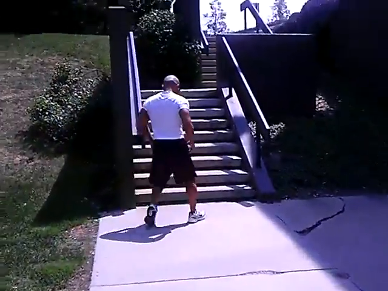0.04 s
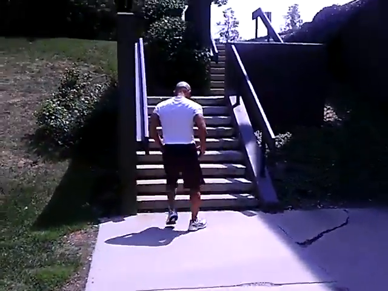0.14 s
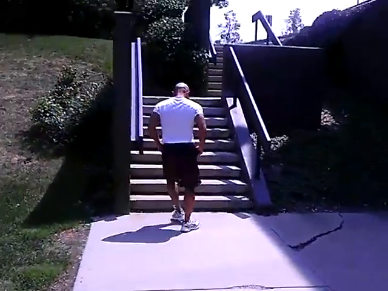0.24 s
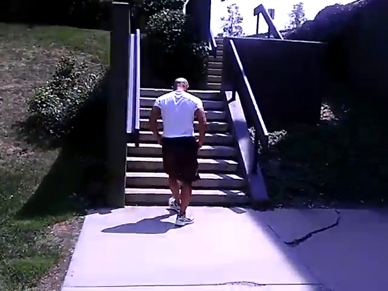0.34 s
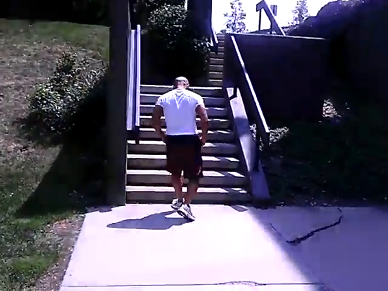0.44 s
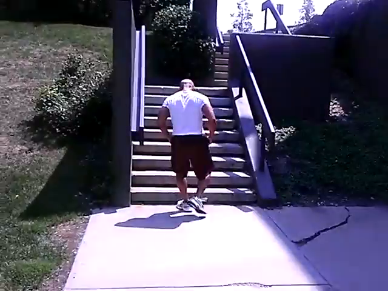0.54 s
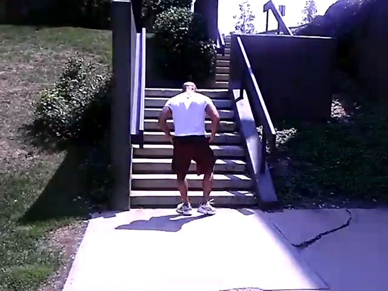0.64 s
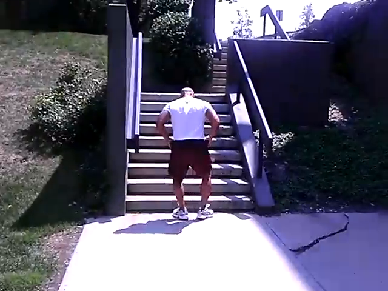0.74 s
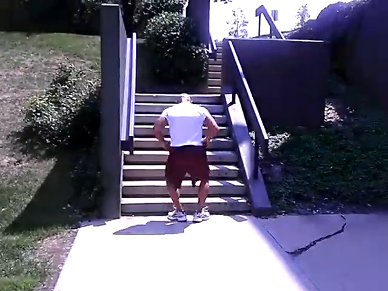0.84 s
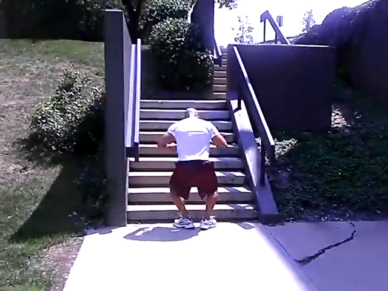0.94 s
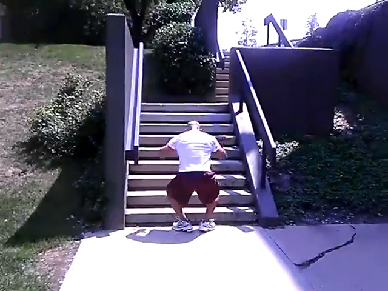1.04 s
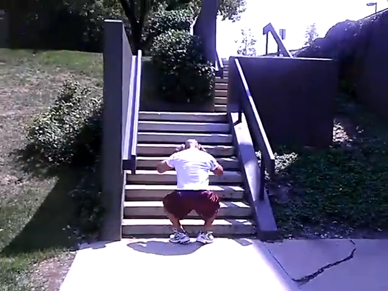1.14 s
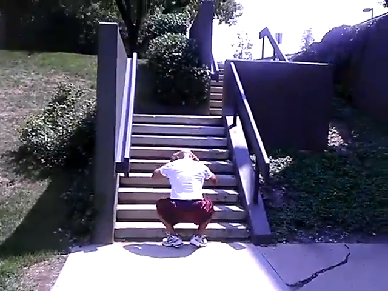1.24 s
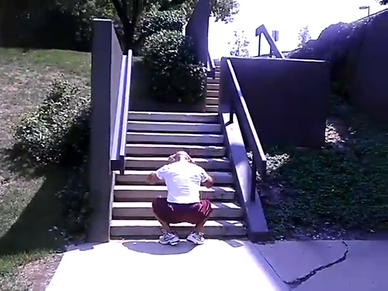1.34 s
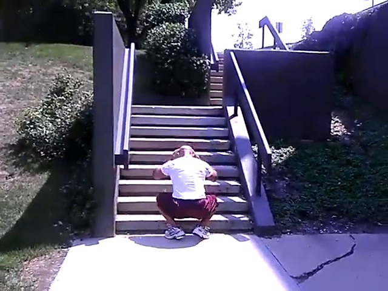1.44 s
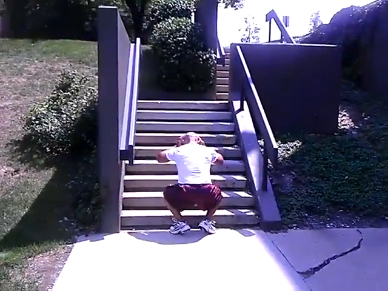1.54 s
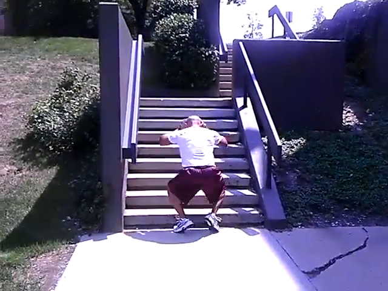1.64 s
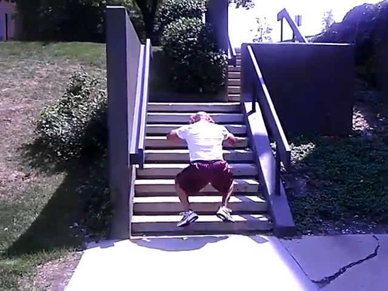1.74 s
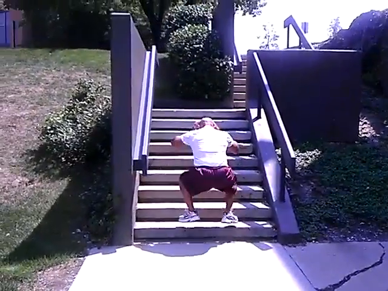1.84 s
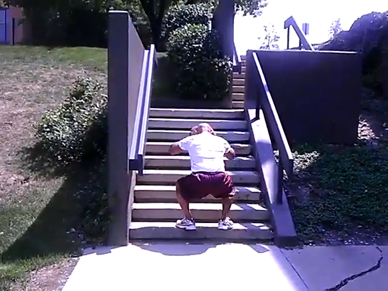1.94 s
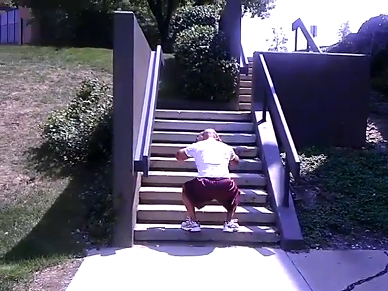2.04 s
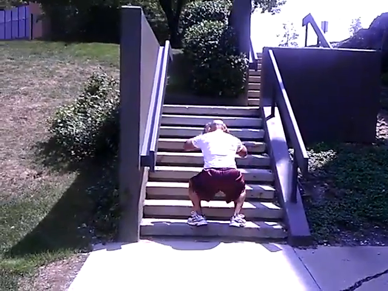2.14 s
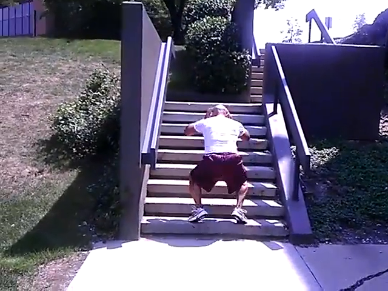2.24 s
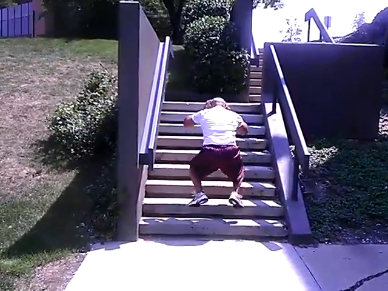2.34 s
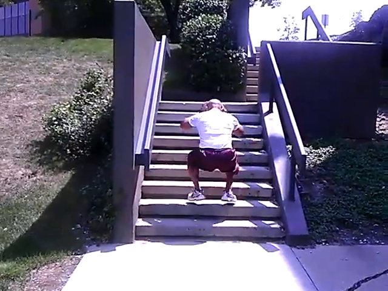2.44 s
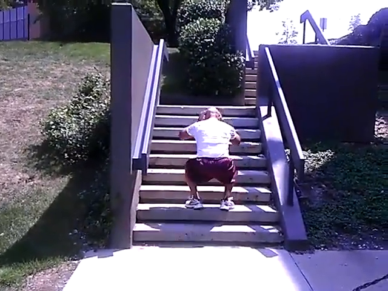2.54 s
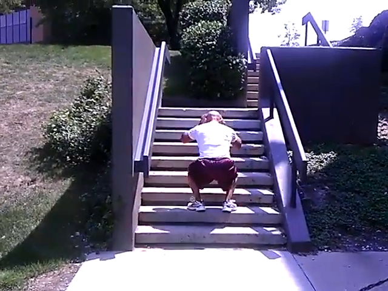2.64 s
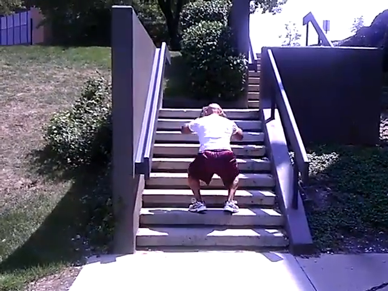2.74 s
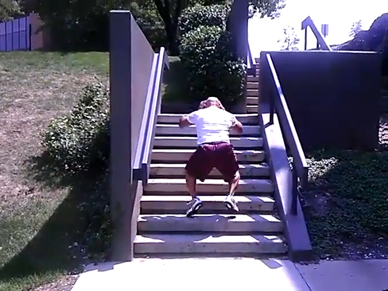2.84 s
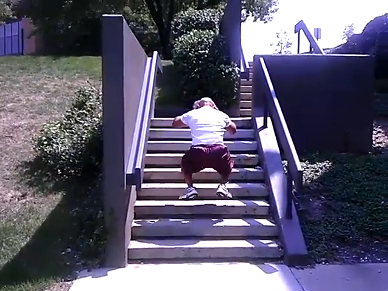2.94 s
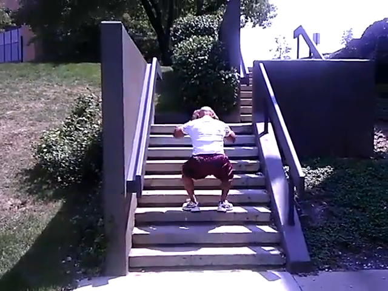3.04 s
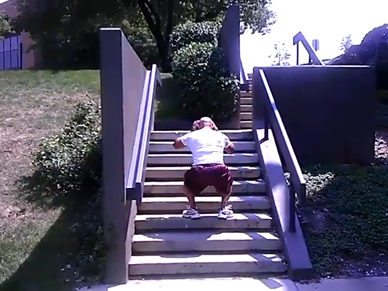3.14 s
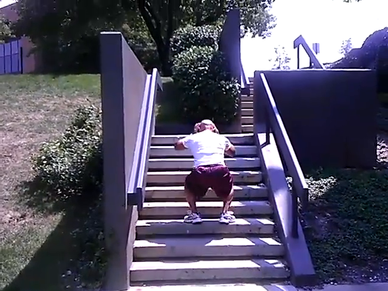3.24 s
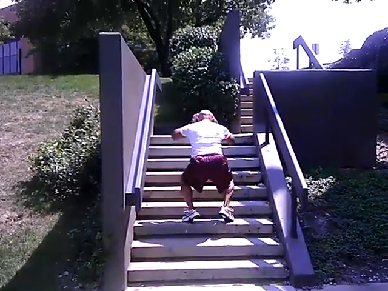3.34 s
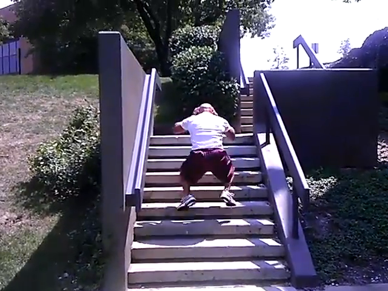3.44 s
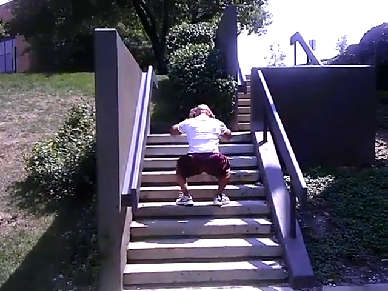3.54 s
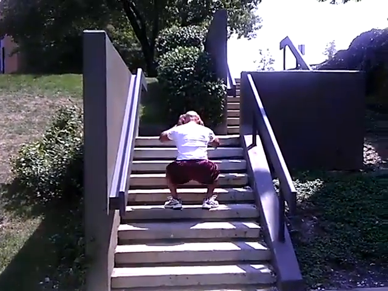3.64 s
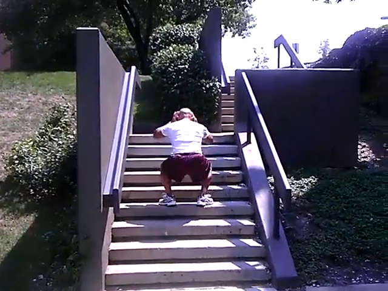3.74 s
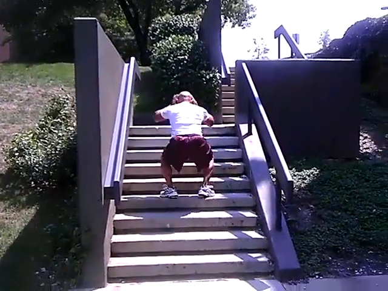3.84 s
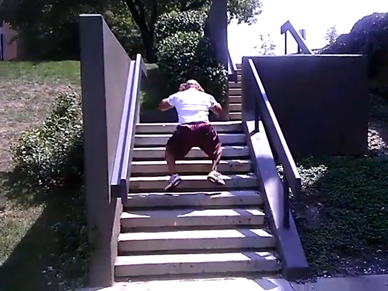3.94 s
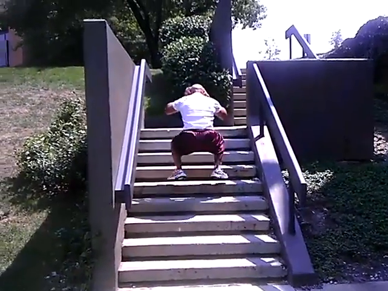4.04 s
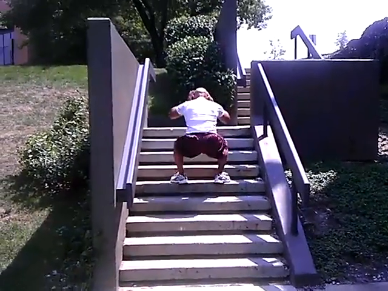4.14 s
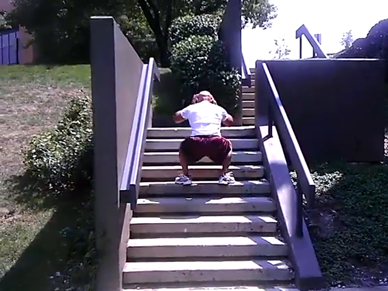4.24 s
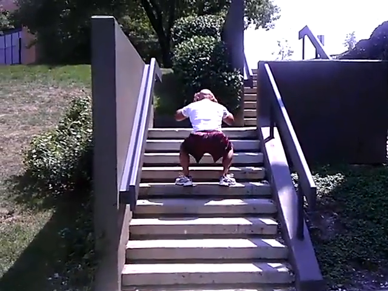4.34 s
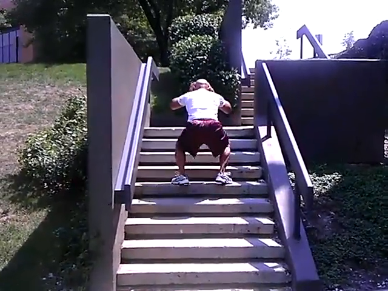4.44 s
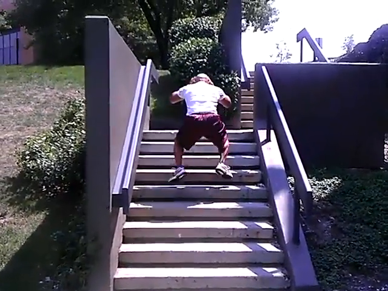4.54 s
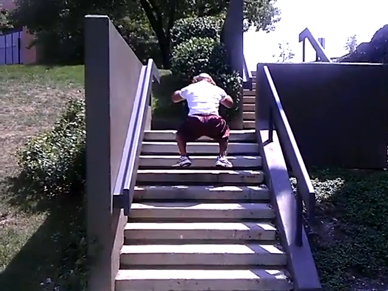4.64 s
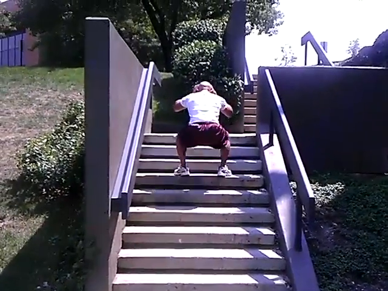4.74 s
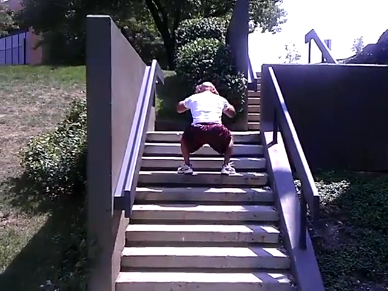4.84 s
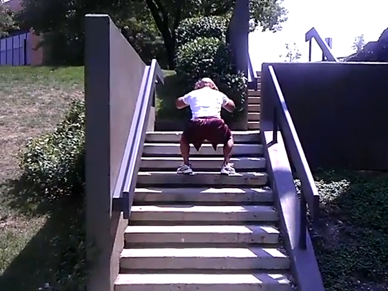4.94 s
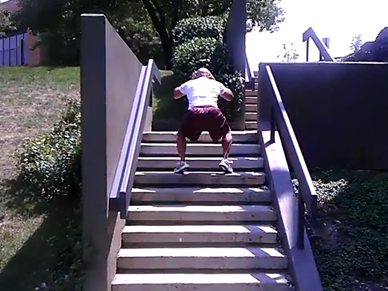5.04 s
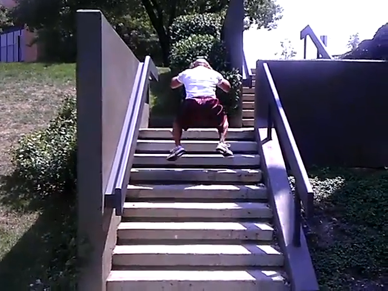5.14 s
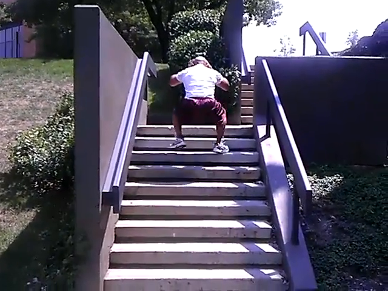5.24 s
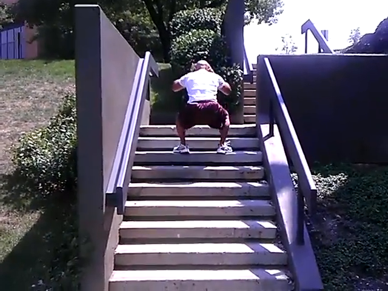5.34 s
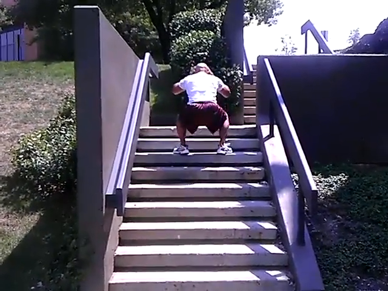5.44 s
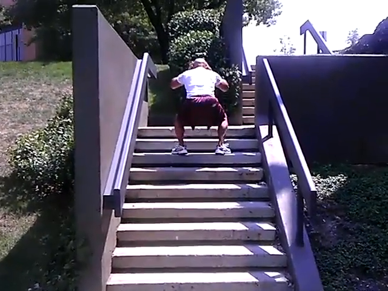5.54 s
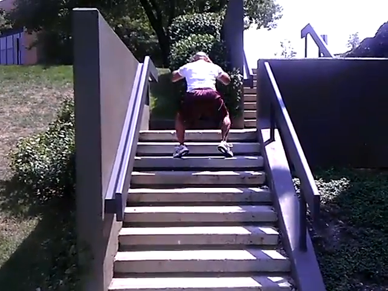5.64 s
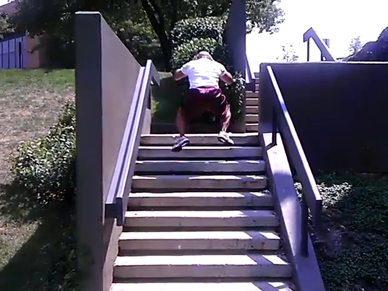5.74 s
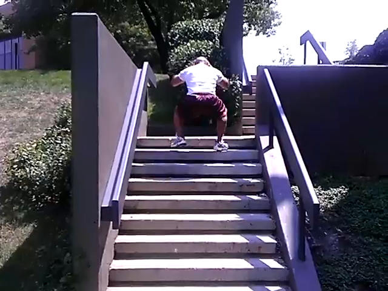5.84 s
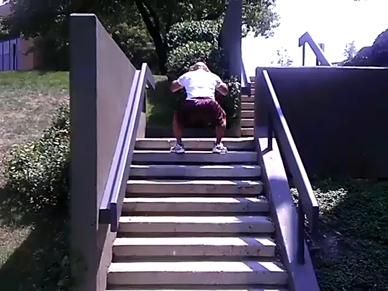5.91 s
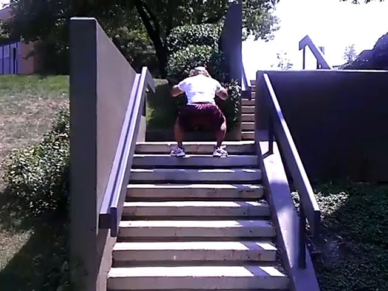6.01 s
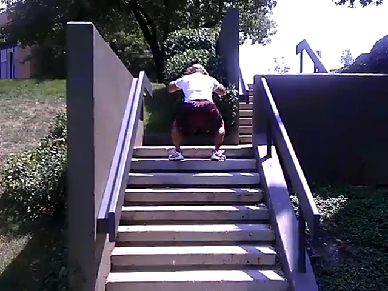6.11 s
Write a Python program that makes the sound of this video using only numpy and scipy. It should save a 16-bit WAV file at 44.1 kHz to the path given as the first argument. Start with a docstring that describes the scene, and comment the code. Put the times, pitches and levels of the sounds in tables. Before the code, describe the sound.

Outdoors by concrete stairs, heard from a few metres through a small microphone with thin bass and dulled top. Distant traffic murmurs over very faint hiss; a far engine drops away in the first half second, then creeps back low. Sneakers scuff and crack grit at about 0.1, then lightly at 0.6, 0.8 and 0.9, with two faint high fluttering bird notes around 0.83 and 0.96. Small grit ticks follow at 1.3, 1.4 and 1.7. Jump landings come at 2.0 (softer, duller), 2.6, 3.1, 3.65, 4.2, 4.8, 5.4 and 6.0: two shoes almost together, then heels settling, a compact slap with hollow thump, airy pop and crushed grit. Faint toe scuffs precede them. The 4.2 landing has a sharp rubber chirp. Walls return short dull echoes and a thin tail. The engine wavers, gathering speed and growing clearer after 5.2, as traffic rises slightly.

```python
"""Far traffic murmurs and a distant engine fades as sneakers shuffle on concrete a few metres away.
Someone then jumps up outdoor stairs with both feet. Each landing is three quick sole contacts, built from
damped modes (thump, hollow slap, air pop) and noise bursts (slap, crack, grit); each take-off is a faint
noise scuff. The engine, a few wavering sine orders, comes back low and gathers speed; a bird calls in
two fluttering sines. Walls throw back short, dull echoes and a thin tail."""
import sys
import numpy as np
from scipy import signal
from scipy.fft import rfft, irfft
from scipy.io import wavfile

SR = 44100
rng = np.random.default_rng(int(sys.argv[2]) if len(sys.argv) > 2 else 0)


def unload_wav(signal):
    """Save mono or channel-first audio to the path in sys.argv[1] as 16-bit WAV at rate SR, clipped to [-1, 1]."""
    wavfile.write(
        sys.argv[1],
        SR,
        np.round(np.clip(np.atleast_2d(signal).T, -1, 1) * 32767).astype(np.int16),
    )


N = 272348
TIME = np.arange(N) / SR
AGE = TIME[:SR // 4]   # time since a blow, s

# Road noise spectrum: f/Hz, density/dB per Hz (only the shape counts)
TRAFFIC_COLOUR = [(22, -16.5), (50, -13.5), (75, -11), (95, -6.5), (122, 0), (165, -7), (220, -6.5),
                  (310, -10), (550, -13.5), (900, -17.5), (1200, -20), (2100, -25), (3000, -34),
                  (5200, -56)]
# Steady hiss spectrum: f/Hz, density/dB per Hz (only the shape counts)
HISS_COLOUR = [(1500, -20), (3000, 5), (4500, 4), (6000, -3), (7300, -2), (8500, 5), (9200, -8)]
HISS_DB = -65
# Far traffic draws slowly nearer: t/s, level/dB (before trim and swell)
TRAFFIC_LEVEL = [(0, -47.5), (2.3, -46.5), (3.25, -44.5), (5.86, -43), (6.18, -40)]
# Far engine fades, comes back low and gathers speed: t/s, firing rate f/Hz, level/dB (before trim)
ENGINE_CURVE = [(0, 115.3, -39.5), (.5, 113, -64), (.72, 101.6, -46), (1.0, 103, -44.5), (1.6, 108, -41.5),
                (1.85, 116, -44), (2.15, 120.5, -40), (3.3, 122.5, -45.5), (3.7, 120, -47),
                (4.2, 127, -42.5), (4.9, 126, -43), (5.25, 126.7, -34), (5.65, 128, -38),
                (6.18, 135, -30.5)]
# Exhaust orders: multiple of the firing rate, level/dB (relative, before throb)
ENGINE_ORDERS = [(.75, -34), (1, -5), (2, -18), (3, -25.5)]
# Left-right likeness of the street and echo tail above the bass: f/Hz, likeness/0-1
FAR_LIKENESS = [(100, .98), (300, .88), (550, .78), (1100, .5), (2300, .35), (5000, .12)]
# Left minus right for the street: f/Hz, level/dB
FAR_LEAN = [(100, 0), (200, .4), (1000, .6), (3000, 2.4), (5500, 2.2), (8500, -2)]
# Distant bird notes: start t/s, length/s, centre f/Hz, level/dB (before flutter)
CHIRPS = [(.827, .07, 4620, -67), (0.957, .08, 4490, -62)]
# Echoes off the stairs and side walls, last off a building across the yard: delay t/s, level/dB
ECHOES = [(.0052, -19), (0.0135, -20), (.029, -24), (.062, -18)]

# Left-right likeness of the shoe noise above the bass: f/Hz, likeness/0-1
NEAR_LIKENESS = [(100, .98), (300, .85), (600, .6), (1200, .62), (2200, .64), (4500, .48), (8000, .35)]
# Left minus right for the shoe bursts: f/Hz, level/dB
NEAR_LEAN = [(180, 0), (600, .4), (1200, 1.2), (2200, 2.0), (3100, 1.2), (5200, 4.4), (7500, -3.5)]
# Grains of grit cracking under a shoe: t/s, level/dB, f/Hz
TICKS = [(.0685, -35, 2320), (.136, -39.5, 2070), (.578, -42, 2400), (0.939, -42, 1800),
         (1.326, -42.5, 3293), (1.4255, -37.5, 1580), (1.731, -38, 2370)]
# Shoes shuffling: middle t/s, level/dB (before flicker), bell spread/s, share of low rasp/0-1
SCUFFS = [(0.072, -47.5, 0.016, 0.37), (0.096, -45.5, 0.0051, 0), (.089, -56.5, 0.048, 0.92),
          (0.58, -58, .0045, 0.02), (.794, -44, 0.01, 0.87), (0.932, -55.5, 0.033, 0.86),
          (1.643, -56.5, .011, 0.25)]
# Bright side of a scuff: f/Hz, density/dB per Hz (only the shape counts)
SCRAPE_COLOUR = [(1500, -37), (3000, 2.5), (4500, 5.5), (6000, 7), (7500, 1.5), (9000, -2.5)]
# Low, rough side of a scuff, also the dust of a tick: f/Hz, density/dB per Hz (only the shape counts)
RASP_COLOUR = [(300, -19.5), (850, 5), (1500, -3.5), (2400, -3), (3500, -13.5), (6000, -21.5)]
# Rubber catching as a shoe lands or settles: t/s, f/Hz, level/dB, time to fall 60 dB/s
SLIPS = [(2.679, 5500, -57.5, 0.075), (3.164, 5900, -47, .04), (4.206, 5086, -21, .0086),
         (4.216, 3550, -28, 0.021)]

# Flat of the sole slapping: f/Hz, density/dB per Hz (only the shape counts)
SLAP_COLOUR = [(40, -46), (85, 2), (200, 3.5), (330, -3), (450, 1), (650, 2), (950, -2), (1300, -13),
               (2200, -9), (3000, -54)]
# Air cracking out of the tread: f/Hz, density/dB per Hz (before the pocket tilt)
CRACK_COLOUR = [(600, -28.5), (1050, 5), (1500, 3), (2150, 2), (2500, -5.5), (2950, -20), (4000, -29.5)]
# Sand crushed under rubber: f/Hz, density/dB per Hz (before the brightness tilt)
GRIT_COLOUR = [(1200, -1), (2300, 8.5), (2950, -4.5), (3700, 2), (5000, -7.5), (6100, -6), (7200, -17),
               (9000, -23)]
# Two-footed landings; levels are the first shoe's, before the layer trims:
# t/s, flight before it/s, lag of the second shoe/s, force on the second shoe/dB, weight shift to it/dB,
# heels settling/dB, heel thud level/dB, thump level/dB, thump f/Hz of first and second shoe,
# slap level/dB, slap f/Hz, air pop level/dB, pop f/Hz of first and second shoe,
# grit level/dB, grit brightness/dB per octave
LANDINGS = [(1.975, .222, 0.013, -5.5, 3, -4, -32, -24, 261, 194, -26.5, 592, -38, 2030, 1400, -37.5, 4.5),
            (2.5567, 0.21, 0.01, -1.5, -6.5, -12, -28, -17, 278, 349, -22, 675, -20.5, 1960, 1950, -22, 4),
            (3.1046, 0.19, 0.011, 1, 2, -1.5, -32, -17.5, 273, 421, -22.5, 669, -14.5, 1550, 1980, -23.5, 4.5),
            (3.648, .179, .010, 6.5, -5.5, 3.5, -18.5, -25, 250, 244, -29, 1000, -23, 1475, 1946, -34.5, 9),
            (4.206, 0.17, .0145, 0.5, -1.5, -2, -22.5, -12, 264, 225.4, -21.5, 605, -22, 1140, 1460, -23, -1.5),
            (4.813, 0.1904, .016, 0, 2.5, -1, -21.5, -19.5, 274, 214, -21, 886, -23.5, 1520, 1480, -28, 5),
            (5.3751, 0.18, .0172, 0.5, -1, 4.5, -21.5, -17, 277.6, 249, -24, 596, -21, 1410, 1430, -30.5, 2),
            (5.973, 0.22, .017, 2, -1, -0.5, -22, -20, 211, 270, -22.5, 544, -22, 1360, 1125, -31, 4.5)]
# Second shoe lands flatter and softer; offsets for heel thud/dB, thump/dB, slap/dB, air pop/dB, grit/dB
SECOND_SHOE_DB = (-1, -0.5, 0, -5, -2)
# Heels settling; offsets for heel thud/dB, thump/dB, slap/dB, air pop/dB, grit/dB
SETTLE_DB = (-5.5, -15, -10.5, -12.5, -10)
SETTLE_LAGS = 1.92   # the heels settle this many lags after the first touch
HEEL_HZ = 171.3
GRIT_DULLING_DB = 2.5   # per octave, at each later contact
POCKET_TILT_DB = 14.5   # a smaller air pocket cracks brighter: dB per octave for each octave of pop pitch
# Every take-off is the same scuff, fainter with each step away
TAKEOFF_DB, TAKEOFF_LOSS_DB_PER_STEP, TAKEOFF_SPREAD_S, TAKEOFF_RASP = -53.5, 0.8, 0.022, .45

MIC_LOW_CUT_HZ, CUTOFF_HZ = 79, 9050


def from_db(db):
    """Decibels to gain."""
    return 10 ** (np.asarray(db) / 20)


def rms_one(x):
    """Scale to unit power."""
    return x / np.sqrt(np.mean(x ** 2) + 1e-20)


def at_hz(points, hz):
    """Read a table on a log-frequency axis."""
    f, value = np.transpose(points)
    return np.interp(np.log(hz + 1e-9), np.log(f), value)


def in_time(rows):
    """Join the rows of a curve by straight lines."""
    s, *columns = np.transpose(rows)
    return [np.interp(TIME, s, column) for column in columns]


def drift(rate_hz):
    """Random wander of spread 1, smoothed above rate_hz."""
    hz = np.arange(N // 2 + 1) * SR / N
    spectrum = rfft(rng.standard_normal(N)) / (1 + (hz / rate_hz) ** 2)
    return rms_one(irfft(spectrum, N))


def noise(colour, likeness, size, lean=None):
    """Coloured stereo noise of unit power; long waves reach both microphone ports alike."""
    hz = np.arange(size // 2 + 1) * SR / size
    long_wave = 1 / (1 + (hz / 250) ** 2)
    alike = long_wave + (1 - long_wave) * at_hz(likeness, hz)
    mid, side = rfft(rng.standard_normal((2, size)))
    signs = np.array([[1], [-1]])   # left, right
    both = np.sqrt(1 + alike) * mid + np.sqrt(1 - alike) * side * signs
    lean_db = signs * at_hz(lean, hz) / 2 if lean else 0
    return rms_one(irfft(both * from_db(at_hz(colour, hz) + lean_db), size))


def fade(rise, t60):
    """A blow swells and dies away; height 1."""
    shape = (1 - np.exp(-(AGE / rise) ** 2)) * from_db(-60 * AGE / t60)
    return shape / shape.max()


def burst(colour, rise, t60, grain_db=0):
    """A dying puff of noise, grainy from one millisecond to the next; its energy is set by the blow alone."""
    shape = fade(rise, t60)
    grains = np.interp(AGE, np.linspace(0, AGE[-1], 250), rng.standard_normal(250))
    puff = noise(colour, NEAR_LIKENESS, len(AGE), NEAR_LEAN) * shape * from_db(grain_db * grains)
    return rms_one(puff) * np.sqrt(np.mean(shape ** 2))


def ring(hz, rise, t60):
    """One damped mode."""
    return np.sin(2 * np.pi * hz * AGE) * fade(rise, t60)


def add(out, s, sound):
    """Mix a sound in at time s."""
    start = int(s * SR)
    out[:, start:start + sound.shape[-1]] += sound[..., :N - start]


def traffic(swell_db):
    """Far road noise over a faint steady hiss."""
    level_db, = in_time(TRAFFIC_LEVEL)
    road_gain = from_db(level_db + 1 + swell_db * drift(15))
    road = road_gain * noise(TRAFFIC_COLOUR, FAR_LIKENESS, N, FAR_LEAN)
    hiss = from_db(HISS_DB) * noise(HISS_COLOUR, FAR_LIKENESS, N, FAR_LEAN)
    return road + hiss


def engine(waver_hz, throb_db):
    """Only the lowest exhaust orders carry this far; they waver on the way."""
    hz, level_db = in_time(ENGINE_CURVE)
    phase = 2 * np.pi * np.cumsum(hz + waver_hz * drift(9.5)) / SR
    drone = np.zeros(N)
    for multiple, order_db in ENGINE_ORDERS:
        drone += from_db(order_db + throb_db * drift(1.7)) * np.sin(multiple * phase)
    return from_db(level_db - 3.5) * rms_one(drone)


def bird(flutter_db):
    """Two thin, fluttering notes from the trees, each gliding slightly down."""
    out = np.zeros((2, N))
    for s, length, hz, level_db in CHIRPS:
        size = int(length * SR)
        pitch = hz * np.linspace(1.005, .995, size) + 70 * drift(200)[:size]
        note = np.hanning(size) * np.sin(2 * np.pi * np.cumsum(pitch) / SR)
        add(out, s, from_db(level_db) * note)
    return out * from_db(flutter_db * drift(60))


def yard(x, tail_db, t60, wall_hz):
    """A few dull wall echoes and a thin scattered tail."""
    dull = signal.sosfilt(signal.butter(1, wall_hz, fs=SR, output="sos"), x)
    out = x.copy()
    for delay, level_db in ECHOES:
        add(out, delay, from_db(level_db) * dull)
    age = TIME[:SR]
    tail_colour = [(80, -23.5), (300, 3.5), (900, -2), (2200, 4.5), (8000, 1)]   # f/Hz, density/dB per Hz
    tail_shape = from_db(-60 * age / t60) * (1 - np.exp(-age / 0.0074))
    tail = noise(tail_colour, FAR_LIKENESS, SR) * tail_shape
    tail /= np.sqrt(np.sum(tail ** 2) / 2)   # unit energy per side
    return out + from_db(tail_db) * signal.fftconvolve(dull, tail, axes=1)[:, :N]


def ticks():
    """A single grain cracks: a cycle or two of ringing and a little dust."""
    out = np.zeros((2, N))
    for s, level_db, hz in TICKS:
        crack = ring(hz, rise=0.00011, t60=0.0017)
        dust = 0.91 * burst(RASP_COLOUR, rise=0.00051, t60=0.011)
        add(out, s, from_db(level_db) * (crack + dust))
    return out


def takeoffs():
    """A scuff of the toes one flight time before each landing."""
    return [(s - flight, TAKEOFF_DB - TAKEOFF_LOSS_DB_PER_STEP * step, TAKEOFF_SPREAD_S, TAKEOFF_RASP)
            for step, (s, flight, *_) in enumerate(LANDINGS)]


def scuffs():
    """Rubber drags over rough concrete in uneven slips."""
    out = np.zeros((2, N))
    scrape = noise(SCRAPE_COLOUR, NEAR_LIKENESS, N)
    rasp = noise(RASP_COLOUR, NEAR_LIKENESS, N)
    for s, level_db, spread, low in SCUFFS + takeoffs():
        start = max(s - 3 * spread, 0)
        span = slice(int(start * SR), int((s + 3 * spread) * SR))
        stroke = from_db(level_db) * np.exp(-((TIME[span] - s) / spread) ** 2 / 2)
        out[:, span] += stroke * (np.sqrt(1 - low) * scrape[:, span] + np.sqrt(low) * rasp[:, span])
    return out * from_db(3.7 * drift(200))


def slips(width_octaves):
    """Tread sticks and lets go in a short, rough chirp: a narrow band of noise."""
    out = np.zeros((2, N))
    skirt = 2 ** width_octaves
    for s, hz, level_db, t60 in SLIPS:
        band = [(hz / skirt, -40), (hz, 0), (hz * skirt, -40)]
        add(out, s, from_db(level_db) * burst(band, rise=0.00091, t60=t60))
    return out


def contact(levels_db, thump_hz, slap_hz, pop_hz, tilt_db):
    """The tread meets grit, air pops out from under the sole, then the body's weight thumps the cushion."""
    heel_db, thump_db, slap_db, pop_db, grit_db = levels_db
    # the soft midsole loads slowly, so the low notes come last
    heel = from_db(heel_db) * ring(HEEL_HZ, rise=0.0091, t60=0.058)
    thump = from_db(thump_db) * ring(thump_hz, rise=0.0095, t60=0.05)
    # the flat of the sole slaps the step with a hollow note
    slap = from_db(slap_db - 1.5) * burst(SLAP_COLOUR, rise=0.0021, t60=0.12, grain_db=2.5)
    hollow = from_db(slap_db - 2.0) * ring(slap_hz, rise=0.0028, t60=0.03)
    # air squeezed out of the tread
    pop = from_db(pop_db + 4.0) * ring(pop_hz, rise=0.00084, t60=0.021)
    pocket_tilt_db = POCKET_TILT_DB * np.log2(pop_hz / 1500)
    crack_colour = [(hz, db + pocket_tilt_db * np.log2(hz / 1500)) for hz, db in CRACK_COLOUR]
    crack = from_db(pop_db - 2.5) * burst(crack_colour, rise=0.00086, t60=0.071, grain_db=3.5)
    # sand crushed under the rubber
    grit_colour = [(hz, db + tilt_db * np.log2(hz / 3500)) for hz, db in GRIT_COLOUR]
    grit = from_db(grit_db) * burst(grit_colour, rise=0.001, t60=0.082, grain_db=1.5)
    return heel + thump + slap + hollow + pop + crack + grit


def landings():
    """Each landing is three contacts: one shoe, the other a moment later, then the heels settling."""
    out = np.zeros((2, N))
    for (s, _, lag, force_db, shift_db, settle_db, heel_db, thump_db, thump_hz, thump2_hz,
         slap_db, slap_hz, pop_db, pop_hz, pop2_hz, grit_db, tilt_db) in LANDINGS:
        first_db = np.array([heel_db, thump_db, slap_db, pop_db, grit_db])
        later_db = first_db + force_db
        later_db[:2] += shift_db   # weight counts only in the low notes
        second_db = later_db + SECOND_SHOE_DB
        heels_db = later_db + settle_db + SETTLE_DB
        first = contact(first_db, thump_hz, slap_hz, pop_hz, tilt_db)
        second = contact(second_db, thump2_hz, 1.048 * slap_hz, pop2_hz, tilt_db - GRIT_DULLING_DB)
        heels = contact(heels_db, .85 * thump2_hz, .88 * slap_hz, pop2_hz, tilt_db - 2 * GRIT_DULLING_DB)
        add(out, s, first)
        add(out, s + lag, second)
        add(out, s + SETTLE_LAGS * lag, heels)
    return out


def scene():
    """Shoes on the stairs and a bird, echoed by the yard, in front of the distant street."""
    street = traffic(swell_db=1.0) + engine(waver_hz=0.96, throb_db=2.5)
    near = bird(flutter_db=2) + ticks() + scuffs() + slips(width_octaves=0.63) + landings()
    return street + yard(near, tail_db=-18, t60=0.48, wall_hz=4000)


def record(dry):
    """The small microphone loses the deep bass; the recorder cuts the top steeply."""
    low_cut = signal.butter(2, MIC_LOW_CUT_HZ, "high", fs=SR, output="sos")
    top_cut = signal.ellip(10, .3, 70, CUTOFF_HZ, fs=SR, output="sos")
    thin = signal.sosfilt(low_cut, dry)
    return signal.sosfilt(top_cut, thin)


dry = scene()
out = record(dry)
unload_wav(out)
```